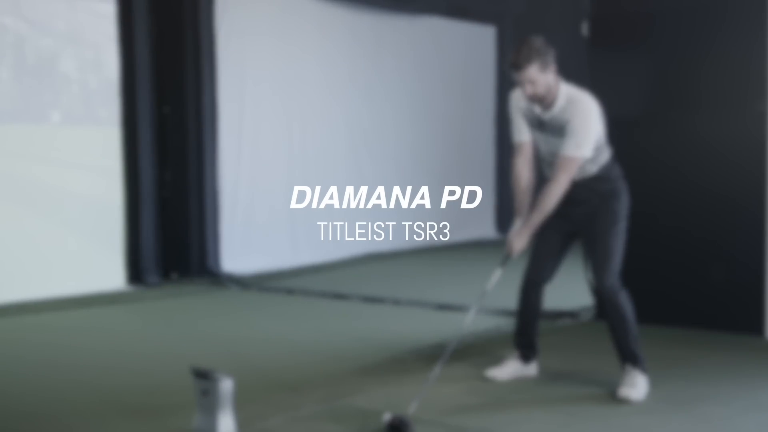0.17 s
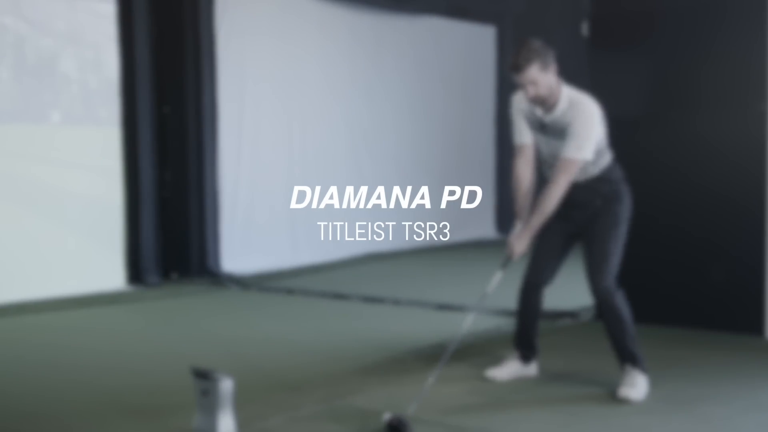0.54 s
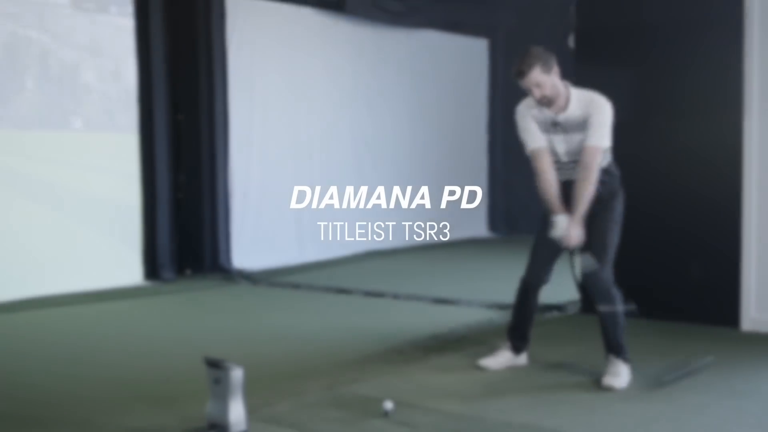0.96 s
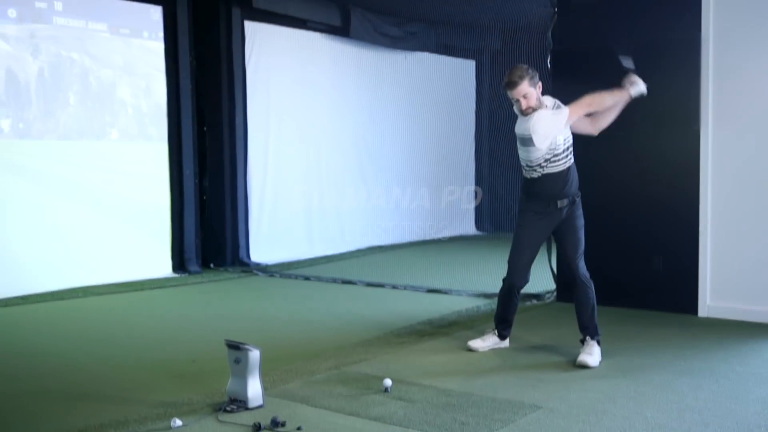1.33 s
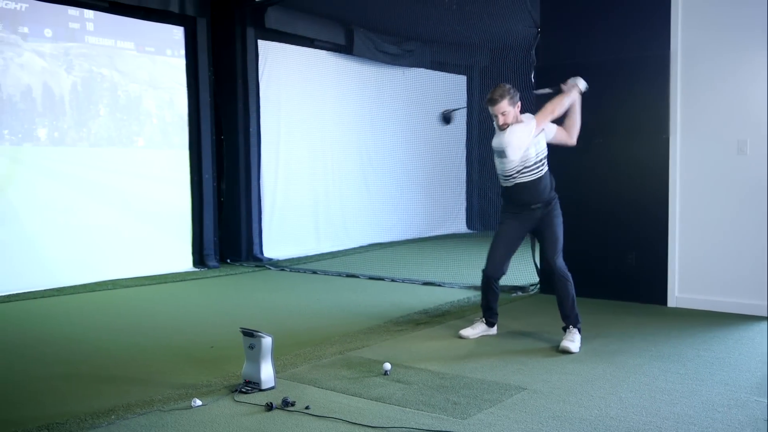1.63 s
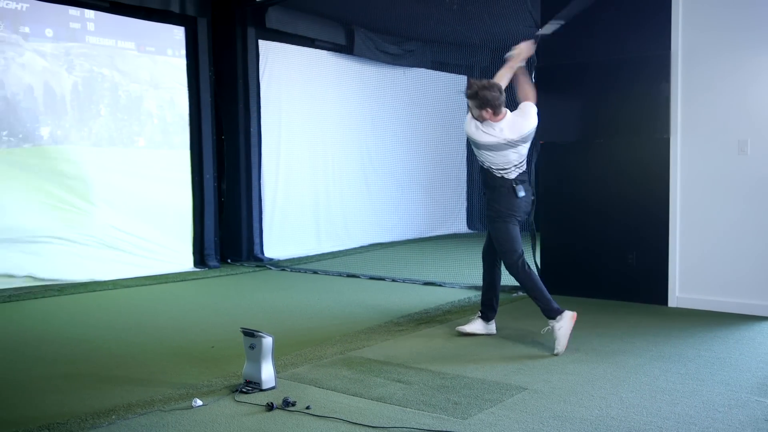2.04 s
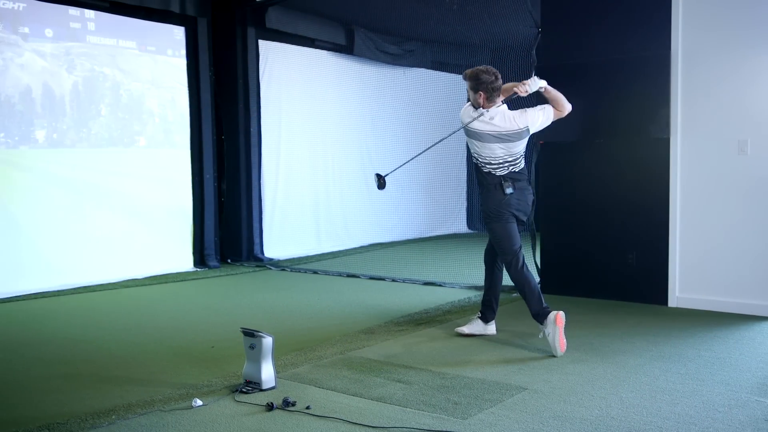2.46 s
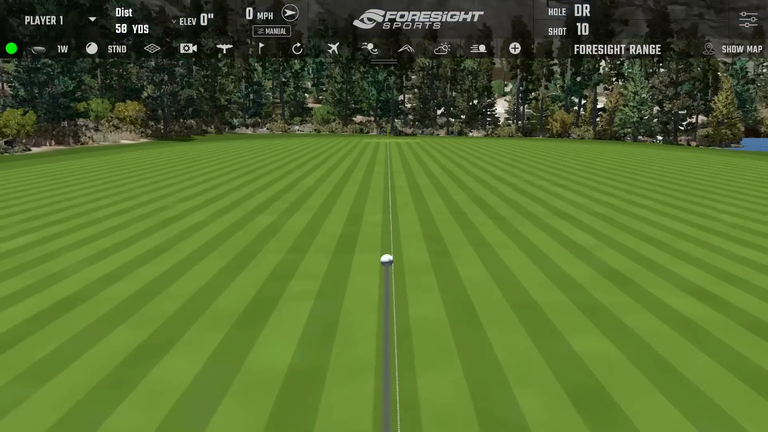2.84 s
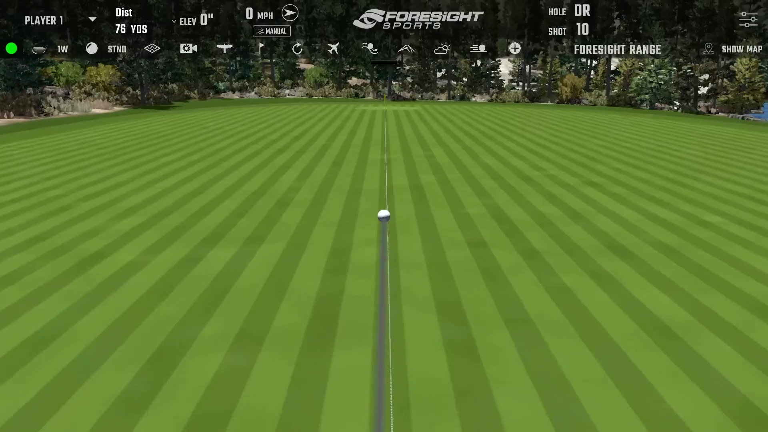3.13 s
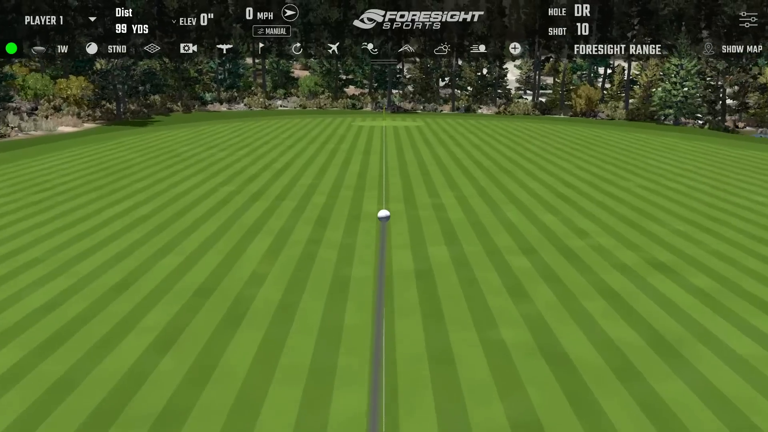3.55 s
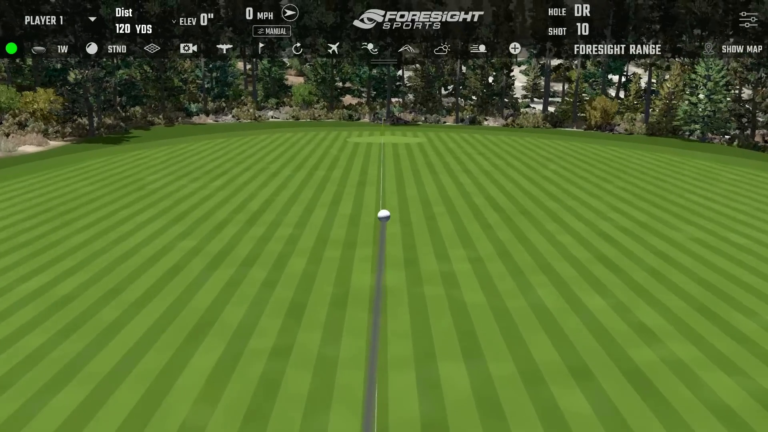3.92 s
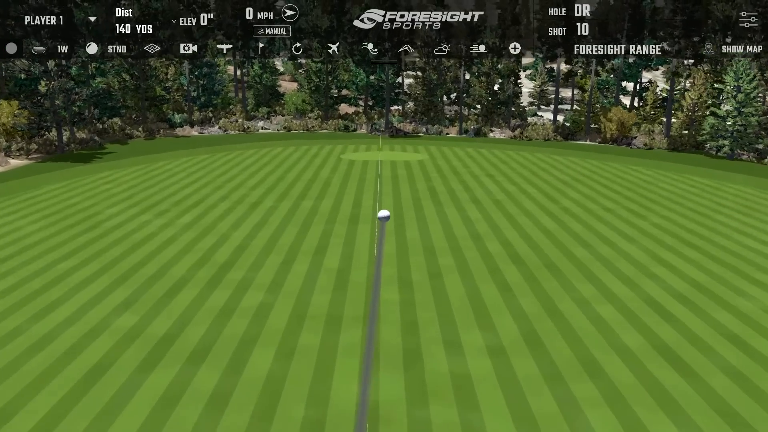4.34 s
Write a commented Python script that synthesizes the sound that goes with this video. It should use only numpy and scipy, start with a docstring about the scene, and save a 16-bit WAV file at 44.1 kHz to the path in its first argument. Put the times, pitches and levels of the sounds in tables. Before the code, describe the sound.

Low ventilation hums in a hard-walled indoor golf bay. Clothes rustle as the golfer turns, the driver shaft whooshes briefly, then a very loud crack with metallic ring hits, and almost at once a cloth screen booms deeply. The room rings for about a second. The ball lands with a soft thud, a duller knock follows farther off, then tiny ticks and a mouth click. Mono, heavily limited at the impact.

```python
"""In a hard indoor golf bay, a driver whooshes down and cracks a ball into a cloth screen, which booms.
Filtered noise makes the ventilation, the rustling clothes and the swish; dying sines make the rings.
Noise that fades band by band is the room ringing on, and a limiter flattens the loudest moments.
The ball lands, a dull knock follows farther off, and small ticks and one close mouth click are heard."""
import sys
import numpy as np
from scipy import signal
from scipy.io import wavfile
from scipy.ndimage import uniform_filter1d

SR = 44100
rng = np.random.default_rng(int(sys.argv[2]) if len(sys.argv) > 2 else 0)


def voltage_ratio(decibels):
    """Convert decibels (scalar or array-like) to amplitude ratios, 20 dB per decade."""
    exponent = np.asarray(decibels, float) / 20
    return 10 ** exponent


def waveform_to_disk(signal):
    """Save audio, clipped to [-1, 1], as 16-bit WAV at the path in sys.argv[1]."""
    frames = np.transpose(np.atleast_2d(signal))
    scaled = np.clip(frames, -1, 1) * 32767
    samples = np.round(scaled).astype(np.int16)
    wavfile.write(sys.argv[1], SR, samples)


N = 197700  # length in samples

# "Relative" levels are shifted later by the overall level of their source.
# How long the bay rings at each pitch: [f/Hz, time to die by 60 dB/s]
BAY_RING = [(60, 1.2), (150, 1.12), (400, 0.93), (1000, 1.142), (2500, 1.263), (5000, 0.98), (8000, 0.65),
            (12000, 0.36), (16000, 0.26)]
# Colour of the ventilation: [f/Hz, relative level per Hz/dB]
AIR_COLOUR = [(15, -42.5), (25, -13.5), (76, -5), (111, 0.5), (145, -10.5), (270, -17), (363, -16.5),
              (600, -21), (860, -27), (1330, -33.5), (2500, -40.5), (5000, -45.5), (9000, -48),
              (16000, -50)]
# Wavering fan tones: [f/Hz, level/dB]
FAN_TONES = [(393, -70.5), (545, -69.5), (592, -65.5)]
# Clothes rubbing, one row per stroke:
# [t at full strength/s, level/dB, rise/s, hold/s, fall/s, share of dull hiss added/0-1]
RUSTLE_STROKES = [(1.07, -66, .12, .28, .3, .3), (1.45, -57, .2, .02, .25, .1),
                  (1.49, -45, .025, .075, .08, 0), (1.622, -52, .03, .01, .035, .5),
                  (1.68, -55, .06, .008, .03, .3), (1.722, -42, .04, .016, .05, 1),
                  (2.02, -48, .05, .12, .22, .1), (2.45, -67, .25, .28, .3, .3),
                  (4.29, -67, .03, .045, .04, 0)]
# Colour of the fabric hiss: [f/Hz, relative level per Hz/dB]
CLOTH_COLOUR = [(410, -30.5), (700, -5), (1310, -3.5), (1540, -7), (1770, -2.5), (3400, -7), (4500, -3.5),
                (6000, -8), (11800, -5), (16000, -8.5)]
# Low rumble of the body turning: [t/s, level/dB]
BODY_RUMBLE = [(1.4, -63), (1.5, -43.5), (1.6, -51), (1.76, -35.5), (1.86, -35.5)]
# Small dry ticks: [t/s, peak level/dB, f/Hz]
DRY_TICKS = [(1.361, -25, 12500), (1.681, -46, 11000), (2.16, -24, 12500), (2.859, -46, 11000),
             (3.147, -46, 4700), (3.9605, -41, 4300), (4.0155, -35, 13500), (4.176, -49, 5500),
             (4.289, -46, 6000), (4.313, -41, 8000), (4.325, -46, 3500)]
# Shaft through the air: [t/s, whistle level/dB, eddy pitch f/Hz]
SHAFT_PATH = [(1.771, -56, 420), (1.803, -36.5, 560), (1.831, -22, 760), (1.863, -24.5, 950),
              (1.9, -25, 900), (1.958, -45, 700)]
# Hollow club head, and the thump of the ball squashing:
# [f/Hz, relative level/dB, time to die by 60 dB/s, swell/s]
HEAD_MODES = [(46, -16.5, .1, .003), (108.8, -13.5, 0.051, .003), (242, -11, 0.033, 0.0025),
              (1075, -10.5, .02, .001), (2350, -5, 0.0093, .0005), (4530, -25, .4, .025),
              (5720, -10, 0.06, .007), (5865, -11, 0.07, 0.007), (6260, -17, 0.07, .008),
              (6800, -19, .08, .012), (7170, -19, .08, .012), (8700, -16.5, .05, .01),
              (9550, -18, 0.05, 0.0064), (12400, -19.5, 0.036, 0.0045)]
# Broad snap of face on ball: [f/Hz, relative level per Hz/dB]
CRACK_COLOUR = [(150, -45), (250, -8), (303, -3), (860, 0.5), (988, -10), (1310, -5.5), (3770, -14),
                (4410, -9), (7060, -8), (13400, -12.5), (16000, -26.5)]
# Cloth snapping taut: [f/Hz, relative level/dB, time to die by 60 dB/s, swell/s]
PUNCH_MODES = [(152, 4, .1, .009)]
# Lowest room modes: [f/Hz, relative level/dB, time to die by 60 dB/s, swell/s]
BOOM_MODES = [(81.3, -18, 0.66, .02), (103.6, -15, 1.13, 0.005), (148.5, -19, 1.09, 0.019),
              (180.2, -10.5, 0.68, 0.083), (197.5, -7.5, 0.33, 0.011), (342, -23.5, 0.56, 0.012)]
# Colour of the ball hitting taut cloth: [f/Hz, relative level per Hz/dB]
SLAP_COLOUR = [(18, -52.5), (30, -28.5), (91, 2), (155, -2.5), (221, -5.5), (258, -12), (344, -9.5),
               (420, -15.5), (974, -10), (2020, -31), (6000, -32), (7800, -72), (13200, -120)]
# Ball landing on the mat: [f/Hz, level before the swell/dB, time to die by 60 dB/s, swell/s]
BOUNCE_MODES = [(250, -19, .09, .012)]
# Body of the knock: [f/Hz, level before the swell/dB, time to die by 60 dB/s, swell/s]
KNOCK_MODES = [(168.8, -26, 0.17, 0.013)]
# Colour of the knock's reflections: [f/Hz, relative level per Hz/dB]
THUD_COLOUR = [(50, -40), (90, -8), (160, 0), (270, -7), (450, -12), (1100, -9), (1700, -16), (2800, -26),
               (4000, -46), (9000, -70)]
# One close mouth click: [f/Hz, level before the swell/dB, time to die by 60 dB/s, swell/s]
MOUTH_CLICK_MODES = [(1470, -28, .008, .0003), (3900, -28, .004, .0004), (5600, -38, .006, .0005)]


def evened(x):
    """Scales a sound to an rms (average strength) of 1."""
    return x / np.sqrt(np.mean(x ** 2) + 1e-20)


def read(points, hz):
    """Reads between the points of a table along a log-frequency axis."""
    f, value = np.transpose(points)
    return np.interp(np.log(hz + 1), np.log(f + 1), value)


def add(mix, start_s, sound):
    """Adds a sound to the mix from a given time, cut off at the end."""
    part = mix[round(start_s * SR):][:len(sound)]
    part += sound[:len(part)]


def coloured(x, spectrum):
    """Filters with the given spectrum, using only past samples; the filter has energy 1."""
    hz = abs(np.fft.fftfreq(8192, 1 / SR))
    log_gain = np.log(voltage_ratio(np.maximum(read(spectrum, hz), -100)))
    # The Hilbert transform gives the phase that puts the filter's energy as early as possible.
    response = np.exp(np.conj(signal.hilbert(log_gain)))
    taps = np.fft.ifft(response).real[:4096]
    return signal.oaconvolve(x, taps / np.linalg.norm(taps))[:len(x)]


def resonate(x, hz, width_hz):
    """One resonance, fixed or moving: shifts pitch hz down to zero, smooths, and shifts back."""
    turn = np.exp(2j * np.pi * np.cumsum(hz * np.ones(len(x))) / SR)
    r = np.exp(-np.pi * width_hz / SR)
    smooth = signal.lfilter([1 - r], [1, -r], x / turn)
    return 2 * (turn * smooth).real


def ring(modes):
    """Dying sines, each swelling in softly at its own speed."""
    t = np.arange(2 * SR) / SR
    out = np.zeros(2 * SR)
    for hz, db, t60_s, swell_s in modes:
        swell = (1 - np.exp(-t / swell_s)) ** 2
        out += swell * voltage_ratio(db - 60 * t / t60_s) * np.sin(2 * np.pi * hz * t)
    return out


def bay(rise_s, ring_share=1):
    """Room response: dense reflections build up from noise, and each band dies at its own speed."""
    hz, t, z = signal.stft(rng.standard_normal(2 * SR), SR, nperseg=512)
    t60_s = ring_share * read(BAY_RING, hz)[:, None]
    tail = signal.istft(z * voltage_ratio(-60 * t / t60_s), SR, nperseg=512)[1][:2 * SR]
    return tail * (1 - np.exp(-np.arange(2 * SR) / SR / rise_s))


def ventilation():
    """Steady rumble and hiss of moving air, with fan tones made fuzzy by resonating noise."""
    out = voltage_ratio(-46.5) * evened(coloured(rng.standard_normal(N), AIR_COLOUR))
    for hz, db in FAN_TONES:
        out += voltage_ratio(db) * evened(resonate(rng.standard_normal(N), hz, 9))
    return out


def clothes():
    """Fabric rubs in strokes of grainy hiss, some with duller hiss added, over a low body rumble."""
    t = np.arange(N) / SR
    grain = voltage_ratio(1.8 * evened(uniform_filter1d(rng.standard_normal(N), 60)))  # uneven by 1.8 dB rms
    bright = evened(coloured(grain * rng.standard_normal(N), CLOTH_COLOUR))
    dull = evened(resonate(bright, 3600, 5800))
    low = evened(resonate(resonate(rng.standard_normal(N), 81, 100), 81, 100))
    out = low * voltage_ratio(np.interp(t, *np.transpose(BODY_RUMBLE), -120, -120))
    for start_s, db, rise_s, hold_s, fall_s, dull_share in RUSTLE_STROKES:
        before = np.maximum(start_s - t, 0) / rise_s
        after = np.maximum(t - start_s - hold_s, 0) / fall_s
        # A stroke swells by 21 dB in one rise and fades by 21 dB in one fall.
        out += (bright + dull_share * dull) * voltage_ratio(db - 21 * (before + after))
    return out


def tick(peak_db, hz):
    """A click through one damped resonance, thin below it and open above."""
    impulse = np.eye(1, 600)[0]
    click = resonate(np.diff(impulse, prepend=0), hz, 0.35 * hz)
    return voltage_ratio(peak_db) * click / abs(click).max()


def swish():
    """Eddies behind the shaft whistle, gliding up and then down, over a broad rush; the bay carries them on."""
    t = np.arange(N) / SR
    at_s, db, hz = np.transpose(SHAFT_PATH)
    pitch_hz = np.interp(t, at_s, hz)
    whistle = evened(resonate(resonate(rng.standard_normal(N), pitch_hz, 380), pitch_hz, 380))
    rush = evened(resonate(rng.standard_normal(N), 3.5 * pitch_hz, 2700))
    direct = (whistle + voltage_ratio(-14) * rush) * voltage_ratio(np.interp(t, at_s, db, -120, -120))
    return direct + voltage_ratio(-29.5) * signal.oaconvolve(direct, bay(0.0059))[:N]


def strike():
    """The club head is struck and rings; its ring and the broad crack then fill the bay."""
    head = ring(HEAD_MODES)
    crack = voltage_ratio(-14.5) * coloured(bay(0.011), CRACK_COLOUR)
    head_in_bay = voltage_ratio(-40) * signal.oaconvolve(head, bay(0.0032))[:2 * SR]
    return voltage_ratio(6.5) * (head + crack + head_in_bay)


def screen():
    """The cloth pushes a lot of air: a punch and the lowest room modes boom under a dull slap."""
    boom = ring(PUNCH_MODES + BOOM_MODES)
    slap = voltage_ratio(-13.5) * coloured(bay(0.0057), SLAP_COLOUR)
    return voltage_ratio(8) * (boom + slap)


def bounce():
    """The ball lands on the mat, a soft thud of quickly dying sine."""
    return ring(BOUNCE_MODES)


def knock():
    """A low body tone, a quickly fading first wash of reflections, and the bay's weaker long ring."""
    wash = bay(0.012, ring_share=0.45) + voltage_ratio(-7) * bay(0.03)
    return ring(KNOCK_MODES) + voltage_ratio(-33.5) * coloured(wash, THUD_COLOUR)


def mouth_click():
    """A close mouth click: sines that die within a few thousandths of a second."""
    return ring(MOUTH_CLICK_MODES)


def scene():
    """Adds all the sources together into one channel."""
    mix = ventilation() + clothes() + swish()
    for start_s, peak_db, hz in DRY_TICKS:
        add(mix, start_s, tick(peak_db, hz))
    # start times in seconds
    add(mix, 1.8642, strike())
    add(mix, 1.9405, screen())
    add(mix, 2.645, bounce())
    add(mix, 3.15, knock())
    add(mix, 4.2597, mouth_click())
    return mix[None]


def top_cut(x):
    """Nothing passes above the cut-off."""
    return signal.sosfilt(signal.butter(12, 16360, fs=SR, output="sos"), x)


def record(dry):
    """A limiter turns peaks down fast and lets go steadily; what slips past clips; the top is cut."""
    limit_db, recovery_db_per_s, attack_s, edge_hz = -2.5, 380.0, 0.0017, 15800
    peak_db = 20 * np.log10(abs(dry[0]) + 1e-9)
    fall_db = np.arange(N) * recovery_db_per_s / SR
    # The held peak jumps up at once and falls at the recovery speed.
    held_peak_db = np.maximum.accumulate(peak_db + fall_db) - fall_db
    over_db = np.maximum(held_peak_db - limit_db, 0)
    keep = np.exp(-1 / (attack_s * SR))
    cut_db = signal.lfilter([1 - keep], [1, -keep], over_db)
    limited = np.clip(dry / voltage_ratio(cut_db), -1, 1)
    low_pass = signal.firwin(511, edge_hz, window=("kaiser", 9), fs=SR)
    finished = signal.oaconvolve(limited, low_pass[None], "same")
    return top_cut(finished)


dry = scene()
out = record(dry)
waveform_to_disk(out)
```